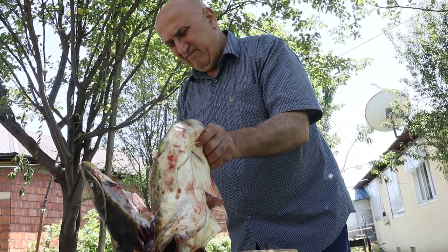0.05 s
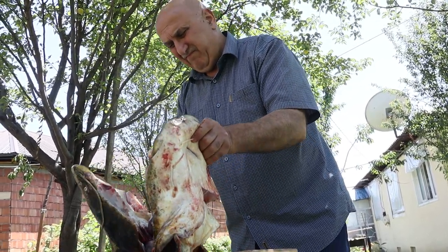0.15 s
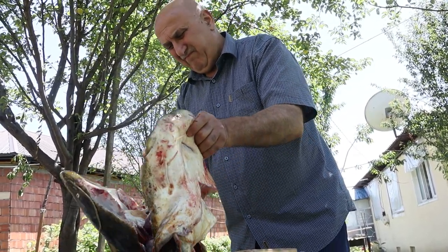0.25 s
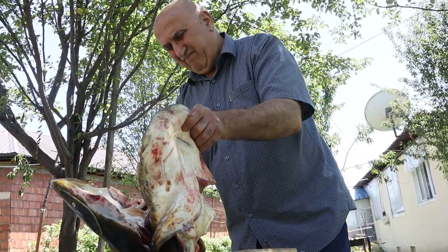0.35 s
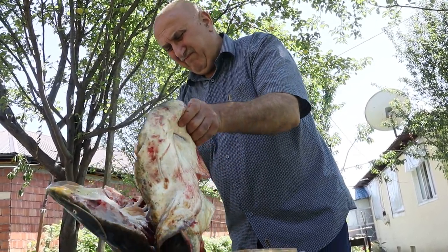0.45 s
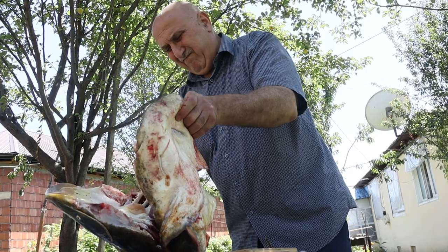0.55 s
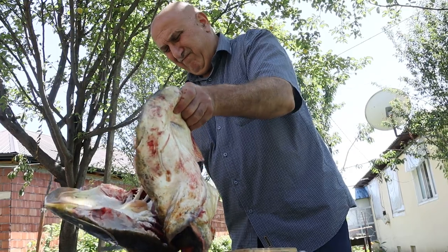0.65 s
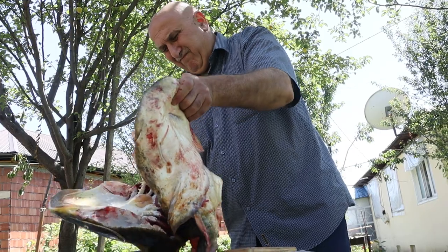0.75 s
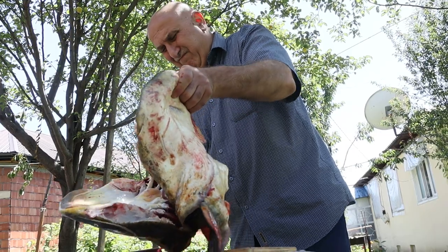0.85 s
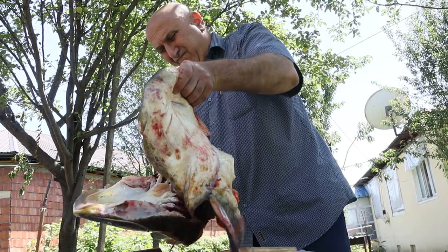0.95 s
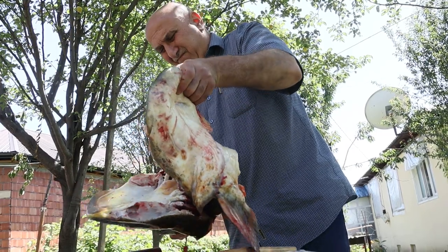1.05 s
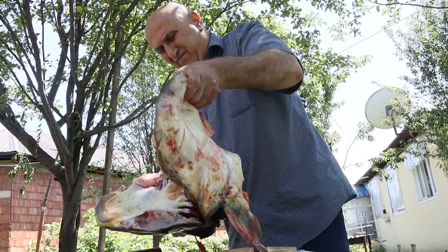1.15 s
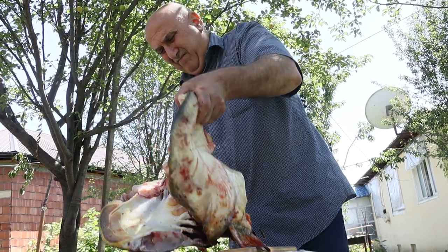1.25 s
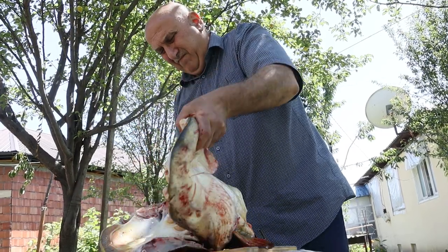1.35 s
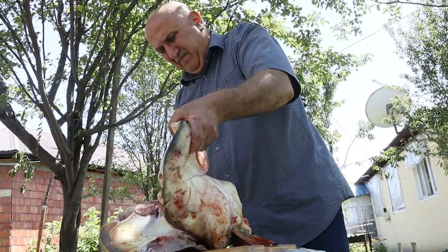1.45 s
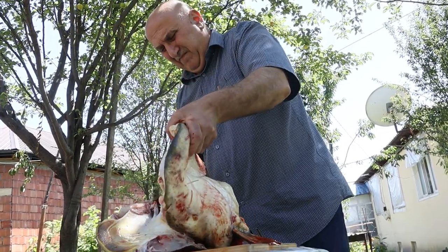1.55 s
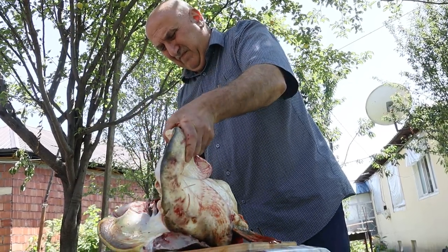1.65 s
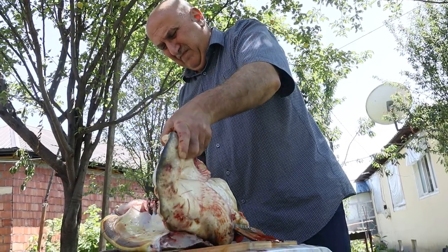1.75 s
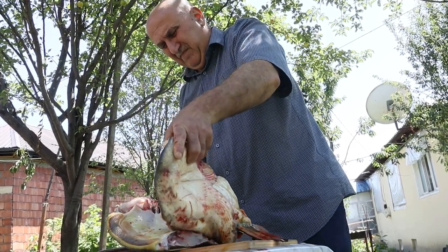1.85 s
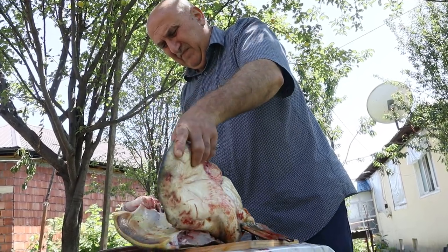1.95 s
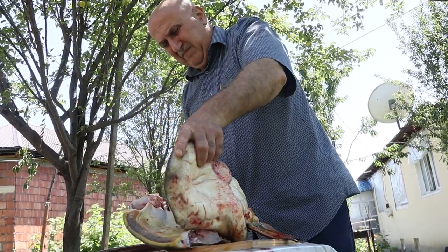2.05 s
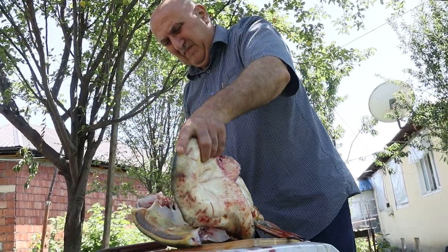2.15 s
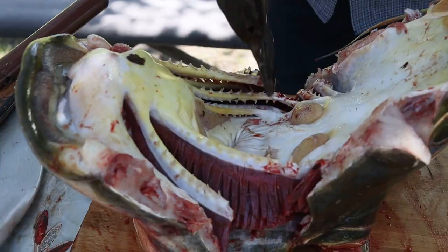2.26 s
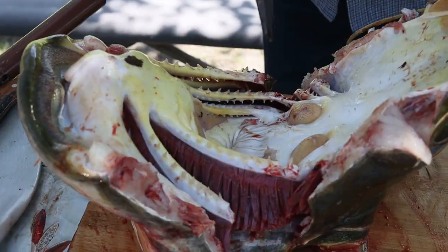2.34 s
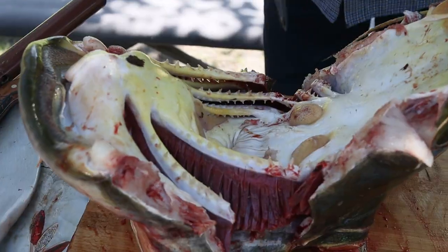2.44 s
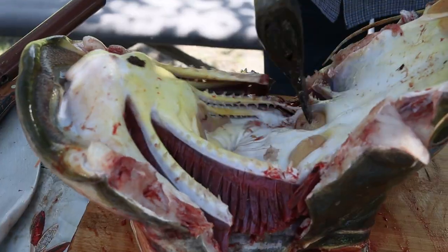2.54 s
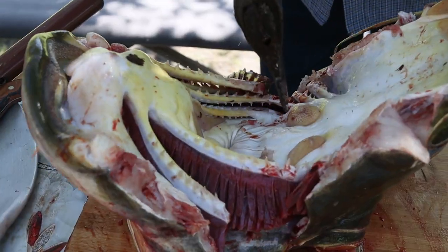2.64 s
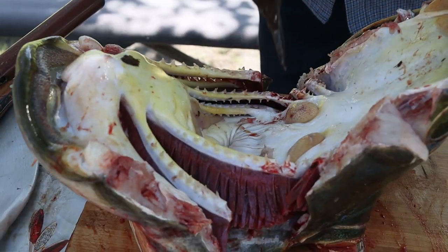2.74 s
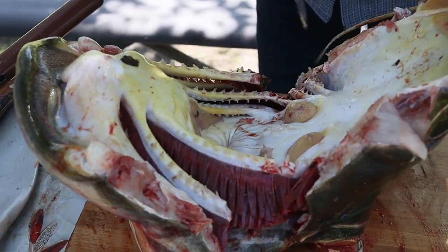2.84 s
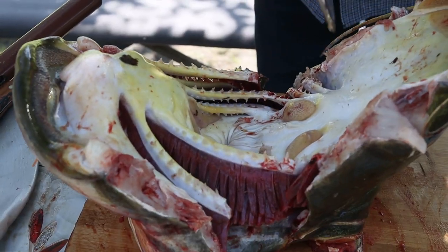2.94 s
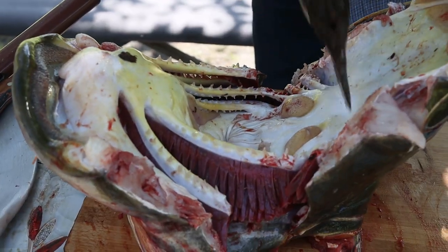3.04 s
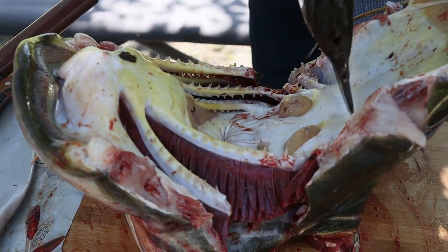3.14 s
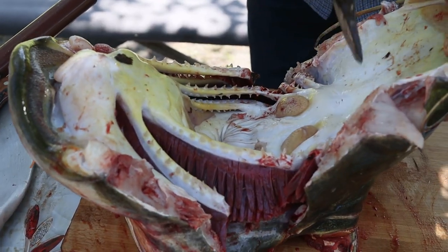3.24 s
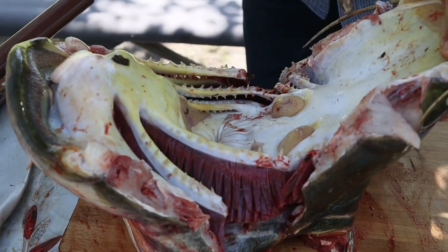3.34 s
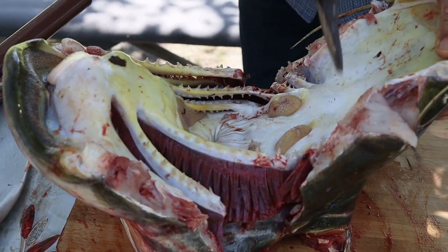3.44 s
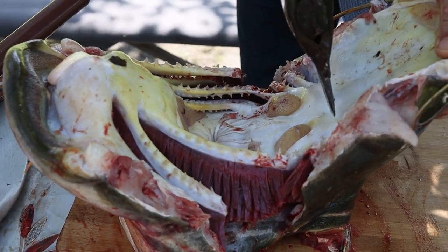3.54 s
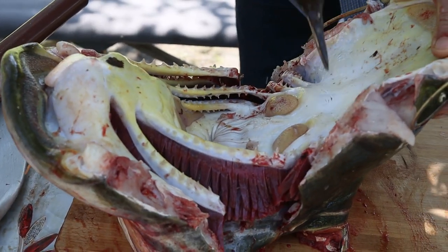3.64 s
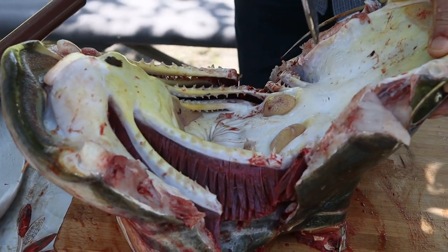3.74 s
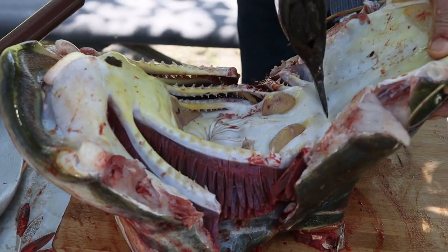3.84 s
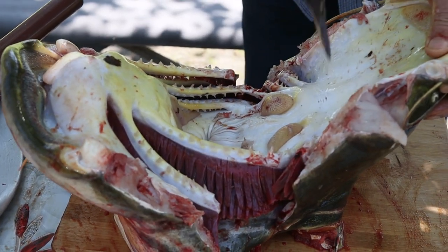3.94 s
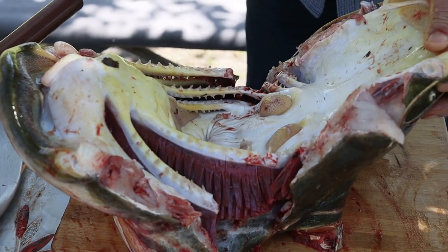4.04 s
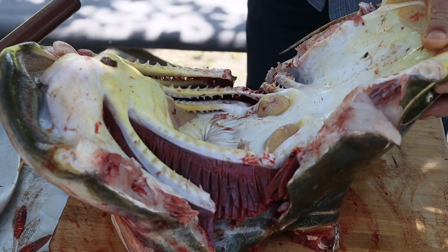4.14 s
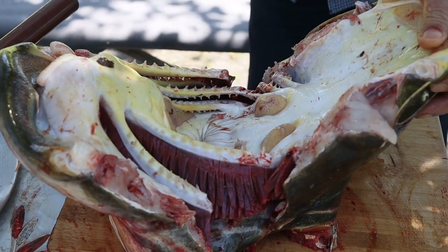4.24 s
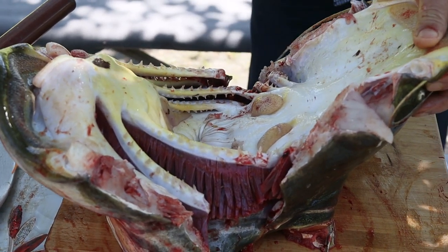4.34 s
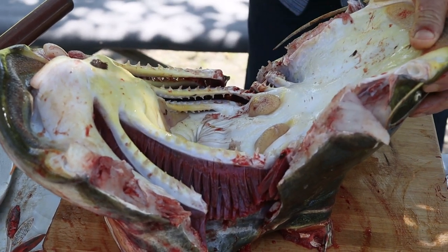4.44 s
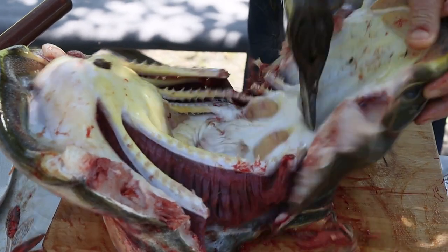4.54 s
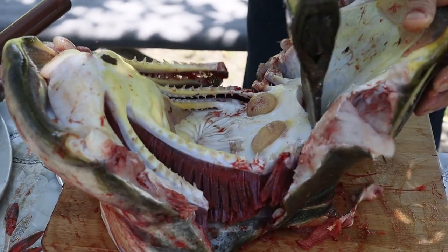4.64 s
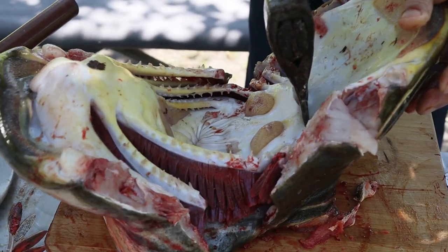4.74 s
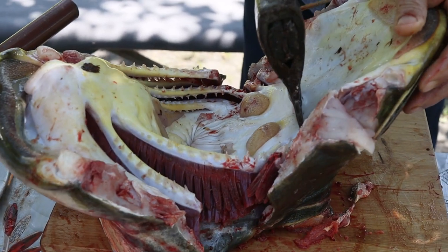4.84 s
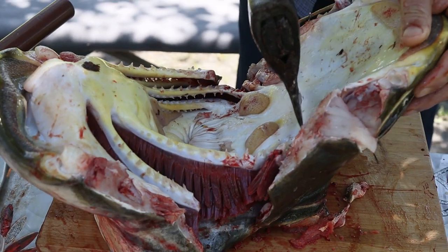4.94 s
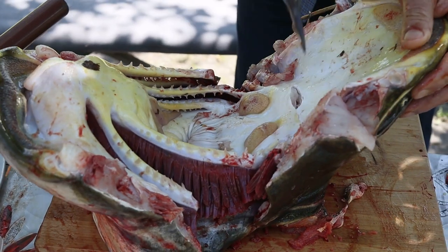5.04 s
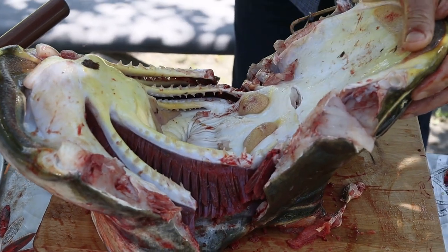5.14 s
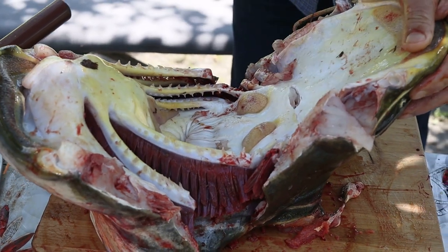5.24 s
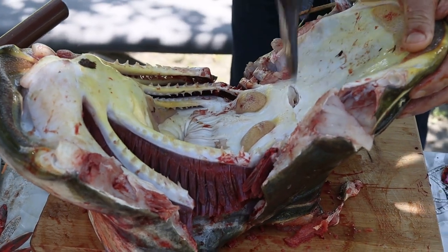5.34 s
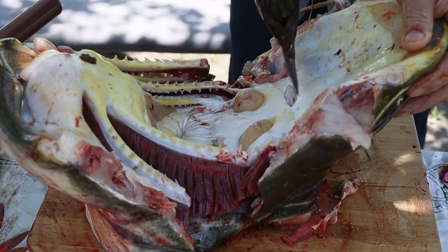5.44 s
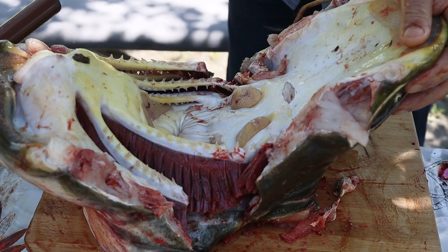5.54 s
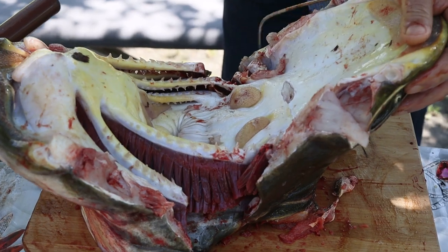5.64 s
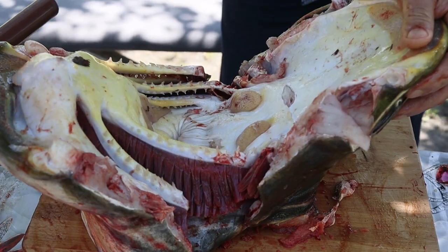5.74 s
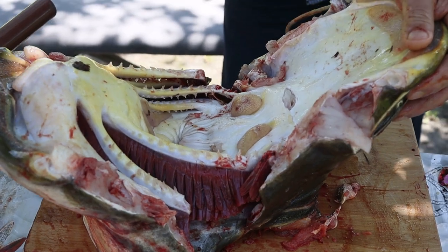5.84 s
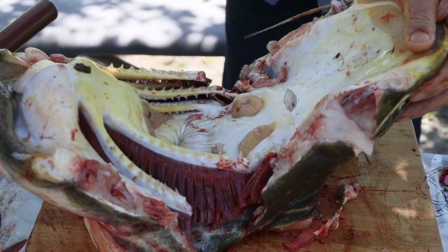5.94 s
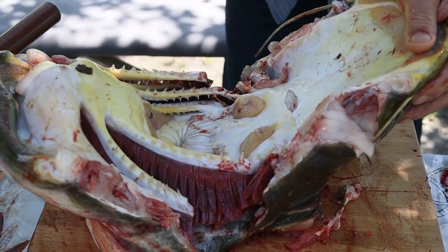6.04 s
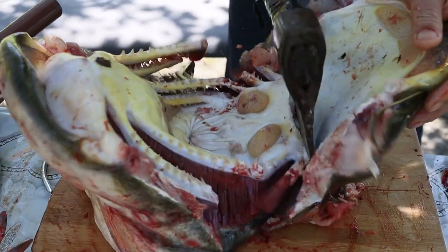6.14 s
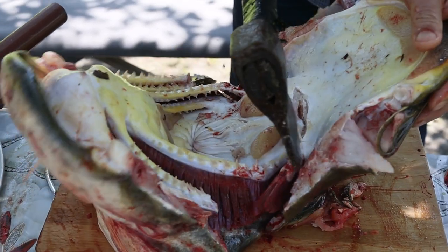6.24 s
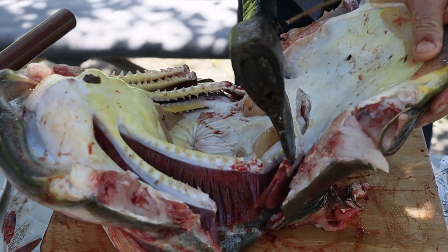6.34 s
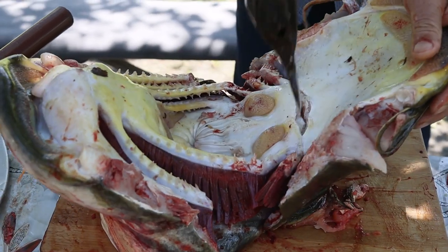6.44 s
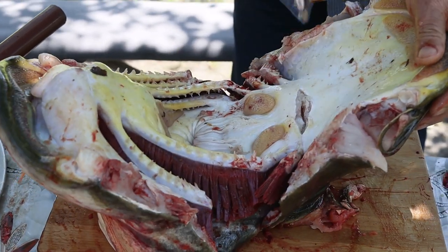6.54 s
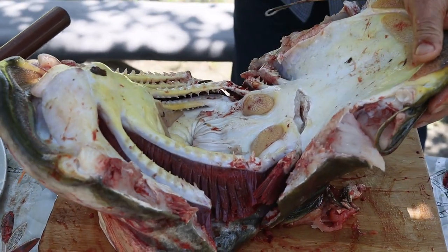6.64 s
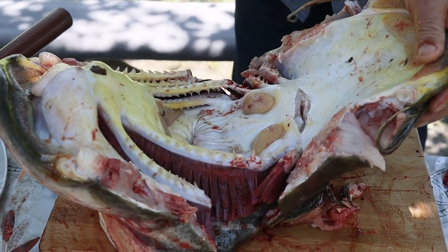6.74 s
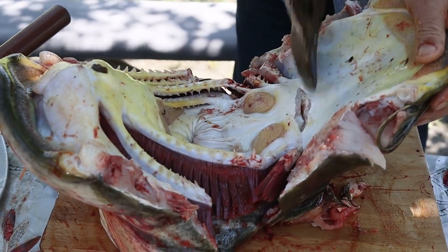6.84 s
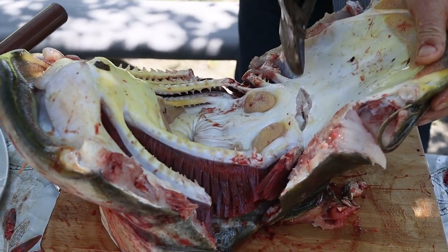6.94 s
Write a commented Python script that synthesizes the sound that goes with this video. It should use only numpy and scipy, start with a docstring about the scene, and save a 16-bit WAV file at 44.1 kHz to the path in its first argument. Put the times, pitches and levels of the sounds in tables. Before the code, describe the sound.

Over a faint outdoor motor hum, a wet fish head cracks and flops onto a board, then a heavy knife chops it eight times, rattling the table.

```python
"""A distant motor hums and whines in a yard, under outdoor air; a thin far whistle glides up twice. A big fish
head is turned and laid on a wooden board: wet skin ticks and hisses, the joint cracks, flesh thumps. After a
brief silence the scene changes: the background is quieter, and a heavy knife chops the head eight times. Each
chop cracks bone, rings the blade and thumps the board; the shaken table rattles on. Tones are unsteady sines,
rings are damped modes, air, flesh and fractures are coloured noise."""
import sys
import numpy as np
from scipy import signal
from scipy.fft import rfft, irfft, next_fast_len
from scipy.io import wavfile
from scipy.ndimage import map_coordinates

SR = 44100
rng = np.random.default_rng(int(sys.argv[2]) if len(sys.argv) > 2 else 0)


def unload_audio(sound):
    """Save the sound as a 16-bit wav file, at the path given as the first command line argument."""
    columns = np.transpose(np.atleast_2d(sound))
    # keep every value between -1 and 1, then stretch to whole-number steps
    steps = np.round(np.clip(columns, -1, 1) * 32767)
    wavfile.write(sys.argv[1], SR, steps.astype(np.int16))


N = 308253
T = np.arange(SR // 3) / SR  # time axis of one short sound, s


def amp(db):
    """Decibels to gain."""
    return 10 ** (np.asarray(db) / 20)


def unit(x):
    """Scale to rms 1."""
    return x / np.sqrt(np.mean(x ** 2) + 1e-20)


def along(points, hz):
    """Interpolate (Hz, value) points on a log frequency axis."""
    f, v = np.transpose(points)
    return np.interp(np.log(hz + 1), np.log(f + 1), v)


def curve(points):
    """Interpolate (s, value) points to one value per sample."""
    s, v = np.transpose(points)
    return np.interp(np.arange(N) / SR, s, v)


def wobble(rate_hz):
    """Smooth random curve, rate_hz knots a second."""
    knots = rng.standard_normal(int(N * rate_hz / SR) + 4)
    return map_coordinates(knots, [np.arange(N) * rate_hz / SR])


def noise(colour, apart_hz, size=len(T)):
    """Coloured stereo noise of rms 1: alike in both ears in the bass, unrelated well above apart_hz."""
    hz = np.fft.rfftfreq(size, 1 / SR)
    mid, side = rfft(rng.standard_normal((2, size))) * amp(along(colour, hz))
    side = side * hz / np.hypot(hz, apart_hz)
    return unit(irfft(np.array([mid + side, mid - side]), size))


def fade(t60_s, rise_s=0.00041):
    """Quick rise and exponential decay."""
    return amp(-60 * T / t60_s) * (1 - np.exp(-T / rise_s))


def swell(start_s, hold_s, rise_s, fall_s):
    """Gain that rises to 1 at start_s, holds and dies away; rise and fall are times for 60 dB."""
    t = np.arange(N) / SR - start_s
    before = np.maximum(-t, 0)
    after = np.maximum(t - hold_s, 0)
    return amp(-60 * (before / rise_s + after / fall_s))


def tone(hz, waver_hz, waver_db):
    """Sine of rms 1, unsteady in pitch and level."""
    level = amp(waver_db * wobble(7))
    phase = 2 * np.pi * np.cumsum(hz + waver_hz * wobble(14)) / SR
    return unit(level * np.sin(phase))


def ring(modes, spread_rad):
    """Damped modes, struck at new strengths; each reaches the two ears at its own phase."""
    hz, db, t60_s = np.transpose(modes)[:, :, None]
    level = amp(db + 2 * rng.standard_normal(hz.shape)) * fade(t60_s)
    phase = rng.uniform(0, 2 * np.pi, hz.shape) + spread_rad * rng.standard_normal((2, *hz.shape))
    return (level * np.sin((2 * np.pi * hz * T + phase).astype(np.float32))).sum(axis=1)


def burst(colour, apart_hz, t60_s, grain_db=3.5):
    """Short spray of tiny fractures or contacts, dying away."""
    grains = amp(grain_db * map_coordinates(rng.standard_normal(len(T)), [T * 900], order=1))
    decay = fade(t60_s, rise_s=0.00036)
    return unit(noise(colour, apart_hz) * grains * decay) * np.sqrt(np.mean(decay ** 2))


def add(track, start_s, sound):
    """Mix a sound into the track at start_s."""
    part = track[:, round(start_s * SR):][:, :len(T)]
    part += sound[..., :part.shape[1]]


# the silent gap where the scene changes: start_s, end_s
GAP_S = (2.232, 2.275)
# air colour before and after the gap: freq_hz, density_db (per Hz, relative)
YARD_EARLY_COLOUR = [(25, -11.5), (59, -2.5), (114, -5.5), (200, -5.5), (300, -10), (450, -5.5),
                     (540, -16.5), (660, -10), (730, -19), (1190, -16.5), (2050, -25), (2480, -26.5),
                     (7100, -43), (16000, -51)]
YARD_LATE_COLOUR = [(25, -45), (70, -19), (140, 3), (230, -0.5), (320, 0.5), (590, -7.5), (800, -3),
                    (1100, -9.5), (1610, -12), (4000, -24.5), (11000, -34.5), (16000, -31)]
# air level before and after, ahead of its trim: time_s, level_db
EARLY_LEVELS = [(0, -40.5), (.5, -37.5), (1.4, -38), (2.22, -40)]
LATE_LEVELS = [(2.27, -46), (3.4, -44), (4.55, -45.5), (5.35, -46), (6.1, -43), (6.95, -47)]
# deep rumble colour: freq_hz, density_db (per Hz, relative)
RUMBLE_COLOUR = [(20, -32), (40, -2), (65, 3), (110, -1.5), (220, -20.5), (500, -47.5)]
# deep rumble level, ahead of its trim: time_s, level_db
RUMBLE_LEVELS = [(2.3, -60), (2.59, -57), (2.76, -58), (4.58, -56.5), (4.71, -70), (5.02, -75), (6.07, -54),
                 (6.48, -59), (6.99, -49)]
EARLY_TRIM_DB, LATE_TRIM_DB, RUMBLE_TRIM_DB = 1.0, -1.5, 4.5


def yard():
    """Outdoor air as coloured noise; after the gap, quieter, unsteady and over a deep rumble."""
    early = np.arange(N) < GAP_S[0] * SR
    before_db = curve(EARLY_LEVELS) + EARLY_TRIM_DB
    before = amp(before_db) * noise(YARD_EARLY_COLOUR, apart_hz=1070, size=N)
    after_db = curve(LATE_LEVELS) + LATE_TRIM_DB + 2.8 * wobble(3.58)
    after = amp(after_db) * noise(YARD_LATE_COLOUR, apart_hz=1230, size=N)
    rumble_db = curve(RUMBLE_LEVELS) + RUMBLE_TRIM_DB
    rumble = amp(rumble_db) * noise(RUMBLE_COLOUR, apart_hz=250, size=N)
    return np.where(early, before, after + rumble)


# deep tone: time_s, level_db
HUM_LEVELS = [(0, -43.5), (1.15, -42.5), (1.7, -58), (2.2, -42), (2.3, -49.5), (5.1, -69.5), (6.99, -59)]
# the octave swells into a drone: start_s, hold_s, level_db
DRONE_SWELL = (6.53, .45, -45)
# whines, low then high: pitch_hz, level_db
WHINE_TONES = [(385.6, -51), (452.3, -46.5)]
# extra swell of the low whine: start_s, hold_s, level_db
LOW_WHINE_SWELL = (2.094, 0.12, -43)
OCTAVE_DB = -7.5  # re deep tone


def motor(motor_hz=67.7):
    """Distant motor: a deep tone, its octave and two wavering whines that stop at the gap."""
    deep = amp(curve(HUM_LEVELS))
    start_s, hold_s, db = DRONE_SWELL
    octave = amp(OCTAVE_DB) * deep + amp(db) * swell(start_s, hold_s, rise_s=1.0, fall_s=0.5)
    hum = deep * tone(motor_hz, waver_hz=1.97, waver_db=-2.0)
    hum = hum + octave * tone(2 * motor_hz, waver_hz=1.0, waver_db=1.5)

    (low_hz, low_db), (high_hz, high_db) = WHINE_TONES
    start_s, hold_s, db = LOW_WHINE_SWELL
    low_level = amp(low_db) + amp(db) * swell(start_s, hold_s, rise_s=0.9, fall_s=0.46)
    low = low_level * tone(low_hz, waver_hz=3, waver_db=0.7)
    high = amp(high_db) * tone(high_hz, waver_hz=3, waver_db=1.4)
    return hum + (low + high) * (np.arange(N) < GAP_S[0] * SR)


# whistles: start_s (full level), hold_s, pitch_hz (at start_s), level_db (peak)
WHISTLE_CALLS = [(.42, .13, 5100, -64), (1.146, .14, 5340, -60)]
GLIDE_HZ_PER_S = 1700


def whistles():
    """Thin far whistle: a sine gliding upwards with a fast random waver."""
    out = np.zeros(N)
    for start_s, hold_s, pitch_hz, db in WHISTLE_CALLS:
        hz = pitch_hz + GLIDE_HZ_PER_S * (np.arange(N) / SR - start_s) + 80 * wobble(500)
        level = amp(db) * swell(start_s, hold_s, rise_s=0.4, fall_s=0.2)
        out += level * np.sin(2 * np.pi * np.cumsum(hz) / SR)
    return out


# placed skin ticks: start_s, level_db (ahead of the trim)
SKIN_TICKS = [(0.481, -27), (0.717, -33.5), (1.076, -41), (1.4125, -26), (1.461, -28), (1.919, -38),
              (4.228, -31), (5.4176, -30), (6.022, -28.5), (6.771, -28)]
FAINT_DB, FAINT_SCATTER_DB, TICK_TRIM_DB = -42.5, 1, -2


def skin_ticks(faint_count=26):
    """Wet skin ticks: very short bright noise, the placed ones plus faint ones at random moments."""
    out = np.zeros((2, N))
    faint = [(rng.uniform(0, N / SR), FAINT_DB + FAINT_SCATTER_DB * rng.standard_normal())
             for _ in range(faint_count)]
    for start_s, db in SKIN_TICKS + faint:
        tick = noise([(1500, -22), (5000, 1.5), (15000, -5.5)], apart_hz=5000)
        add(out, start_s, amp(db + TICK_TRIM_DB) * tick * fade(t60_s=0.0085))
    return out


# crunch colour: pitch_multiple, density_db (per Hz, relative)
CRUNCH_COLOUR = [(.08, -3), (.45, 0), (1, -1), (1.35, -8), (1.8, 2.5), (2.6, -7), (4, -9), (15, -29)]


def crunch(hz, t60_s):
    """Bone gives way: a burst with a few broad resonances around and above its pitch."""
    colour = [(hz * multiple, db) for multiple, db in CRUNCH_COLOUR]
    return burst(colour, apart_hz=4940, t60_s=t60_s)


# neck joint cracks: start_s, level_db
JOINT_CRACKS = [(0.6276, -29), (0.63, -20), (0.649, -29)]
# joint bone modes: pitch_hz, level_db, t60_s
BONE_MODES = [(1378, -3, 0.085), (2430, 7, 0.02), (2590, 0.5, 0.018), (3700, 0, 0.02), (4700, -6, 0.017)]
# snap colour: freq_hz, density_db (per Hz, relative)
SNAP_COLOUR = [(200, -41.5), (1800, -20), (2450, -25), (3100, -1), (4200, 7.5), (5500, -15.5), (15000, -11)]


def joint():
    """The neck joint cracks as the head is bent open: bones ring, snap and crunch at once."""
    out = np.zeros((2, N))
    for start_s, db in JOINT_CRACKS:
        bones = ring(BONE_MODES, spread_rad=0.77)
        snap = amp(1.0) * burst(SNAP_COLOUR, apart_hz=6000, t60_s=0.0099)
        add(out, start_s, amp(db) * (bones + snap + crunch(hz=770, t60_s=0.057)))
    return out


# hands shift the head: start_s, hold_s, hiss_db, squelch_db
HAND_SHIFTS = [(1.35, 0.066, -55.5, -49), (1.444, .1, -53, -37), (1.65, 0.52, -61, -51),
               (4.218, 0.16, -53.5, -58), (4.506, .1, -52, -50.5), (5.15, 0.054, -62, -45.5),
               (5.907, 0.23, -53.5, -49.5), (6.59, 0.1, -52, -41)]
# squelch colour: freq_hz, density_db (per Hz, relative)
SQUELCH_COLOUR = [(60, -24), (200, -9.5), (400, 3), (600, -5), (850, 8), (1450, 2.5), (1900, -5.5),
                  (2500, -3), (3600, -10.5), (5500, -34.5), (15000, -35)]


def handling():
    """With each shift, wet skin hisses under the hands and the head squelches on the board in lumps."""
    levels = np.zeros((2, N))
    for start_s, hold_s, hiss_db, squelch_db in HAND_SHIFTS:
        levels += amp([[hiss_db], [squelch_db]]) * swell(start_s, hold_s, rise_s=0.24, fall_s=0.31)
    hiss, squelch = levels
    skin = noise([(800, -5), (3500, 12.5), (15000, 0.5)], apart_hz=3000, size=N)
    slide = hiss * unit(amp(2.8 * wobble(250))) * skin
    lumps = unit(amp(3.3 * wobble(200) + 2.3 * wobble(40)))
    sag = squelch * lumps * noise(SQUELCH_COLOUR, apart_hz=2980, size=N)
    return slide + sag


# table wood modes: pitch_hz, level_db (relative), t60_s
TABLE_MODES = [(127, 1.5, 0.042), (186, -10.5, 0.068), (289, -9, 0.037)]
# flesh colour: freq_hz, density_db (per Hz, relative)
FLESH_COLOUR = [(25, -29), (70, -28), (130, -17), (190, 2.5), (240, 6), (400, -3), (700, -11.5),
                (3000, -32.5)]


def thump(flesh_db, flesh_t60_s):
    """The table top gives under a blow, and the heavy flesh shudders on it."""
    top = np.zeros(len(T))
    for k, (hz, db, t60_s) in enumerate(TABLE_MODES):
        sign = (-1) ** k  # neighbouring modes start in opposite directions
        top += sign * amp(db) * np.sin(2 * np.pi * hz * T) * fade(t60_s, rise_s=0.0017)
    flesh = noise(FLESH_COLOUR, apart_hz=2000) * fade(flesh_t60_s, rise_s=0.0048)
    return amp(-1.5) * top + amp(flesh_db) * flesh


# board and fish settle: start_s, level_db
SETTLING_BUMPS = [(1.445, -20), (2.286, -26.5), (2.334, -26.5), (5.819, -27)]


def bumps():
    """Board and fish settle with a dull thump."""
    out = np.zeros((2, N))
    for start_s, db in SETTLING_BUMPS:
        add(out, start_s, amp(db) * thump(flesh_db=-7, flesh_t60_s=0.083))
    return out


# bone and gristle snaps: start_s, snap_db, crunch_db
BONE_SNAPS = [(1.448, -31, -28), (1.988, -40, -31), (2.645, -21, -22), (2.655, -12.5, -29),
              (4.639, -6, -19), (5.821, -29, -53), (6.1728, -3.5, -12.5), (6.9602, -13.5, -9.5)]


def snaps():
    """Bone and gristle snap: a bright burst over a lower crunch."""
    out = np.zeros((2, N))
    for start_s, snap_db, crunch_db in BONE_SNAPS:
        snap = amp(snap_db) * burst(SNAP_COLOUR, apart_hz=6000, t60_s=0.013)
        add(out, start_s, snap + amp(crunch_db) * crunch(hz=778, t60_s=0.028))
    return out


# chops: start_s, sink_s (blade sinks in), crack_db, bone_hz, bone_db, blade_db, board_hz, board_db,
# board_t60_s, table_db
KNIFE_CHOPS = [(2.6325, 0.00044, -19, 740, -13, -26, 438, -9, .045, -31),
               (3.1678, 0.0028, -21.5, 1030, -27, -14.5, 370, -6.5, 0.021, -17),
               (3.578, 0.0019, -8, 830, -7.5, -20.5, 405, 0, .02, -8),
               (3.924, 0.0027, -31, 1430, -14.5, -14.5, 380, -5.5, 0.023, -11),
               (4.634, 0.0021, 2.5, 730, 0, -26, 440, -3, .022, -2.5),
               (5.465, 0.0013, -26, 1230, -11, -15, 345, -13, .022, -3),
               (6.1684, 0.0041, -2.5, 1030, 1.5, -7.5, 387, -16.5, 0.025, -4),
               (6.956, 0.0058, -10.5, 895, -18, -18, 390, -1.5, .024, -9)]
# crack colour: freq_hz, density_db (per Hz, relative)
CRACK_COLOUR = [(100, -23), (800, 24), (2500, -28), (4500, 10), (8000, 5), (15000, -33.5)]
# blade modes: pitch_hz, level_db (relative), t60_s
BLADE_MODES = [(3810, -10, .04), (7240, -6, 0.017), (7480, -6.5, 0.032), (10920, -3.5, .018),
               (12870, -5.5, .016)]
LEAD_IN_S, LEAD_IN_DB = 0.00252, -23.5  # soft short crunch before each crack
REBOUND_S, REBOUND_DB, REBOUND_DB_PER_DB = 0.024, -13, 0.45  # delay; level at, and slope on, table_db


def chops():
    """Bone cracks after a soft lead-in, blade rings; board and table take the blow, the head drops back."""
    out = np.zeros((2, N))
    for (start_s, sink_s, crack_db, bone_hz, bone_db, blade_db,
         board_hz, board_db, board_t60_s, table_db) in KNIFE_CHOPS:
        add(out, start_s - LEAD_IN_S, amp(LEAD_IN_DB) * crunch(hz=700, t60_s=0.012))
        add(out, start_s, amp(crack_db) * burst(CRACK_COLOUR, apart_hz=8900, t60_s=0.015))
        add(out, start_s, amp(bone_db) * crunch(bone_hz, t60_s=0.025))
        add(out, start_s, amp(blade_db) * ring(BLADE_MODES, spread_rad=0.53))
        # board damped by the flesh lying on it
        board = np.sin(2 * np.pi * board_hz * T) * fade(board_t60_s, rise_s=0.0008)
        table = thump(flesh_db=-8.0, flesh_t60_s=0.1)
        add(out, start_s + sink_s, amp(board_db) * board + amp(table_db) * table)
        rebound_db = REBOUND_DB + REBOUND_DB_PER_DB * table_db
        add(out, start_s + REBOUND_S, amp(rebound_db) * thump(flesh_db=-7, flesh_t60_s=0.083))
    return out


# spells of chatter: start_s, length_s, first_db, last_db, hardness_db
SHAKE_SPELLS = [(2.703, 0.13, -16.5, -32, 1), (3.226, .08, -15.5, -20.5, -1.5),
                (3.629, .14, -13.5, -32.5, -3), (3.975, .13, -18.5, -25.5, 1), (4.661, 0.071, -33, -35, -7),
                (4.759, .18, -37, -29, 7), (4.959, 0.2, -14, -29.5, 1.5), (5.511, .1, -14, -34.5, -3.5),
                (6.199, .07, -31, -25.5, -7), (6.279, 0.24, -22.5, -23, 4), (6.613, 0.038, -25, -28, -4)]
CONTACTS_PER_S, CHATTER_SCATTER_DB = 55, 3.5


def chatter():
    """Small contacts at uneven times, strength drifting through each spell: (s, strength dB, hardness dB)."""
    rows = []
    for start_s, length_s, first_db, last_db, hardness_db in SHAKE_SPELLS:
        count = round(length_s * CONTACTS_PER_S)
        progress = (np.arange(count) + rng.uniform(size=count)) / count
        scatter_db = CHATTER_SCATTER_DB * rng.standard_normal(count)
        strength_db = first_db + (last_db - first_db) * progress + scatter_db
        rows += [(start_s + length_s * p, db, hardness_db) for p, db in zip(progress, strength_db)]
    return rows


# placed knocks of the table's loose parts, strong and weak: start_s, strength_db, hardness_db
TABLE_KNOCKS = [(2.689, -7, 1.5), (2.7109, -10.5, -5), (2.718, -8.5, -12), (2.7816, -14, -3.5),
                (3.2219, -15, -1), (3.238, -14, -13), (3.3003, -19, 2), (3.615, -11, -5),
                (3.6281, -1.5, -1), (3.727, -16, -0.5), (3.9597, -22, 5), (3.9712, -3.5, -2),
                (3.9813, -7, -10), (4.028, -14, -9), (4.071, -18.5, 1), (4.6567, -10, 1), (4.7373, -6, 7.5),
                (4.758, -3, 1), (4.7949, -17, 6.5), (4.8292, -11, 4.5), (4.8669, -15, 9.5),
                (4.8777, -6, -2.5), (4.9425, -17, -5), (4.9647, -8.5, -1.5), (5.033, -6.5, -1),
                (5.0406, -10, 8.5), (5.079, -15, 7), (5.227, -38.5, -1), (5.4818, -2.5, 2.5),
                (5.5131, -11, -2), (5.5207, -1.5, -0.5), (5.5807, -21, 8.5), (5.657, -35, 3),
                (6.1921, -10, 5), (6.277, -5.5, 7.5), (6.333, -20, 10), (6.3493, -10.5, 6),
                (6.3848, -8.5, 6), (6.4153, -21, 12), (6.4242, -14, 7.5)]
# colours of clack, after-buzz, hard edges, panel clatter: freq_hz, density_db (per Hz, relative)
CLACK_COLOUR = [(50, -50), (200, -20.5), (600, -10.5), (1100, -13.5), (1550, -0.5), (2500, -2.5),
                (3300, -5.5), (4000, 3), (5400, -8), (8000, -16), (15000, -26)]
BUZZ_COLOUR = [(50, -50), (200, 0), (600, 1.5), (1100, -11.5), (1550, -9.5), (2500, 7), (3300, -2),
               (3900, 0), (4700, -5.5), (5500, -6.5), (8500, -13.5), (15000, -18)]
EDGE_COLOUR = [(2000, -37), (5000, -1), (7000, -0.5), (10000, 2.5), (15000, -3)]
CLATTER_COLOUR = [(60, -42), (140, -9.5), (300, -7.5), (580, -4), (820, 1), (1180, 1), (1500, -7.5),
                  (2500, -7.5), (4400, -12.5), (6000, -27.5), (15000, -37.5)]
# table frame and panel modes: pitch_hz, level_db (relative), t60_s
FRAME_MODES = [(2410, -2, 0.047), (2610, -8.5, 0.052), (2920, -5, 0.054), (3750, 4, 0.055),
               (3920, 3.5, 0.047), (4140, -21, 0.043), (4700, -0.5, 0.053), (6533, -10, 0.044),
               (6830, -8, 0.042)]
PANEL_MODES = [(286.6, -9, 0.13), (419, -11.5, 0.17), (691, -13.5, 0.14), (811.7, -3, 0.16),
               (932.5, -4, 0.14), (1043, -0.5, 0.11), (1152, -1, 0.14), (1310, -5, 0.15), (1834, -8, 0.15)]
PANEL_DB, PANEL_DB_PER_STRENGTH_DB, PANEL_DB_PER_HARDNESS_DB = -14.5, 0.52, -0.38
EDGE_DB = -14.5  # re strength, at hardness 0
CLACK_TRIM_DB, PANEL_TRIM_DB = -7.5, -2.5


def rattle(lag_s=0.00013):
    """Contacts clack, buzz and ring frame and panel, a little to the left; weak, soft ones favour the panel."""
    out = np.zeros((2, N))
    for start_s, db, hardness_db in TABLE_KNOCKS + chatter():
        clack = burst(CLACK_COLOUR, apart_hz=4500, t60_s=0.044)
        buzz = amp(-7) * burst(BUZZ_COLOUR, apart_hz=4000, t60_s=0.12)
        frame = amp(-7.0) * ring(FRAME_MODES, spread_rad=1.0)
        add(out, start_s, amp(db + CLACK_TRIM_DB) * (clack + buzz + frame))

        edge = burst(EDGE_COLOUR, apart_hz=2502, t60_s=0.038)
        add(out, start_s, amp(db + EDGE_DB + hardness_db) * edge)

        panel_db = PANEL_DB + PANEL_DB_PER_STRENGTH_DB * db + PANEL_DB_PER_HARDNESS_DB * hardness_db
        clatter = noise(CLATTER_COLOUR, apart_hz=3180) * fade(t60_s=0.11, rise_s=0.0017)
        panel = clatter + amp(-6.5) * ring(PANEL_MODES, spread_rad=0.15)
        left_right = amp([[1.5], [-1.5]])
        add(out, start_s, amp(panel_db + PANEL_TRIM_DB) * panel * left_right)
    return np.array([out[0], np.roll(out[1], round(lag_s * SR))])


# wall reverberation: freq_hz, t60_s
WALL_DECAYS = [(80, 0.085), (300, 0.37), (1000, 0.41), (4000, 0.24), (14000, 0.3)]


def walls(x):
    """House walls answer: convolution with a noise tail whose decay time depends on frequency."""
    hz, t, z = signal.stft(rng.standard_normal((2, len(T))), SR, nperseg=256)
    decay = amp(-60 * t / along(WALL_DECAYS, hz)[:, None])
    tail = signal.istft(z * decay, SR, nperseg=256)[1]
    return signal.fftconvolve(x, tail / np.linalg.norm(tail[0]), axes=1)[:, :N]


def scene():
    """The work at the table with its faint wall echo, in the open yard."""
    outdoors = yard() + motor() + whistles()
    work = skin_ticks() + joint() + handling() + bumps() + snaps() + chops() + rattle()
    return work + amp(-14.5) * walls(work) + outdoors


def record(dry, low_cut_hz=45, top_hz=16100):
    """Microphone thins the deepest bass; a brief silence where the scene changes, clipping at full scale, steep
    band end at top_hz."""
    t = np.arange(N) / SR
    x = signal.sosfilt(signal.butter(2, low_cut_hz, "highpass", fs=SR, output="sos"), dry)
    sounding = (t < GAP_S[0]) | (t > GAP_S[1])
    x = np.clip(x * sounding, -1, 1)
    size = next_fast_len(N + SR)
    in_band = np.fft.rfftfreq(size, 1 / SR) < top_hz
    return irfft(rfft(x, size) * in_band, size)[:, :N]


dry = scene()
out = record(dry)
unload_audio(out)
```